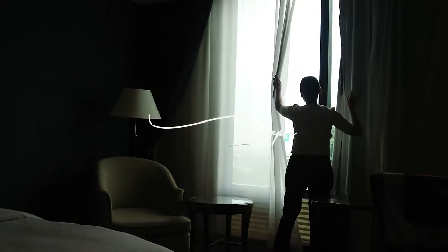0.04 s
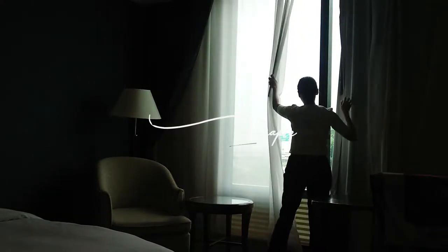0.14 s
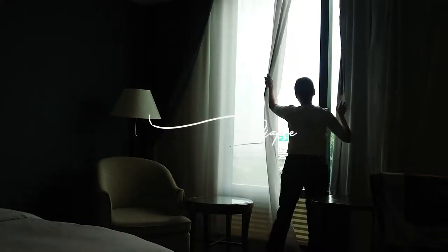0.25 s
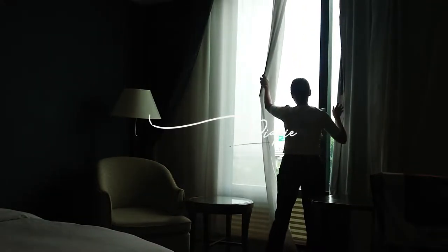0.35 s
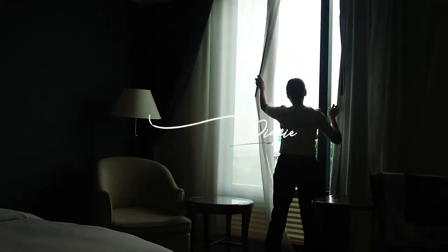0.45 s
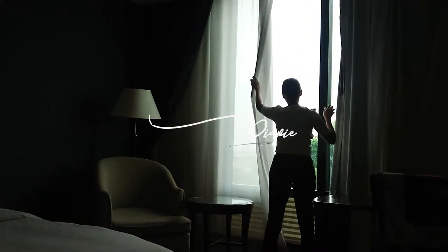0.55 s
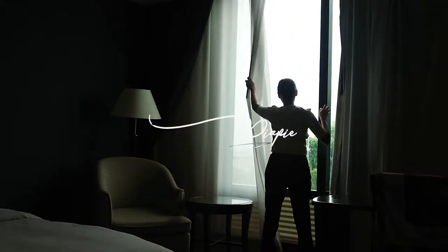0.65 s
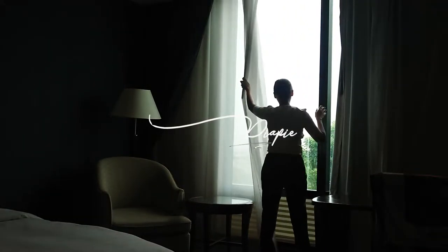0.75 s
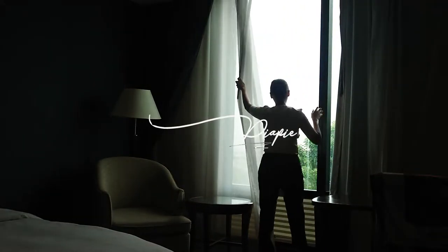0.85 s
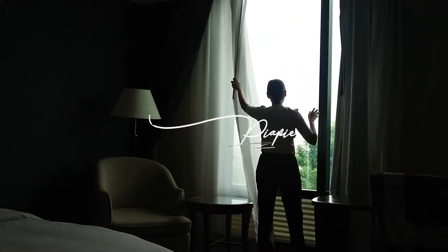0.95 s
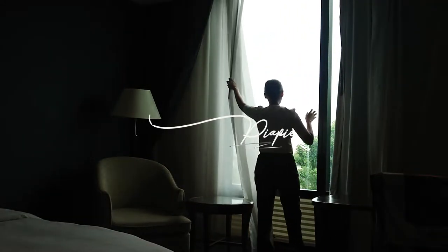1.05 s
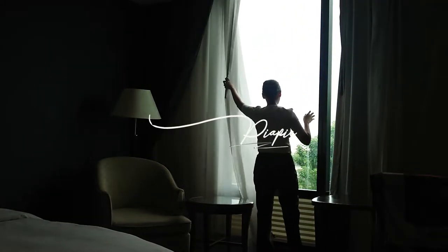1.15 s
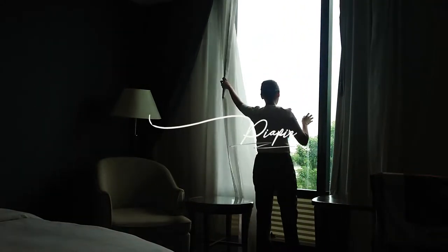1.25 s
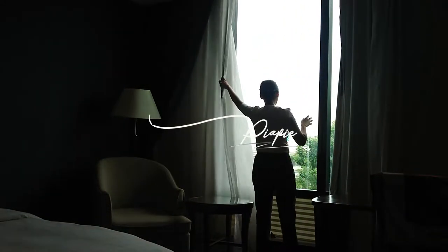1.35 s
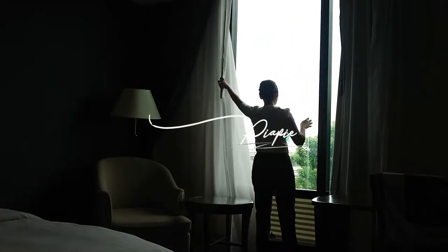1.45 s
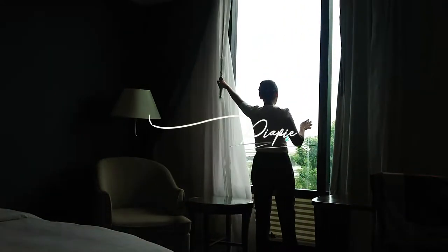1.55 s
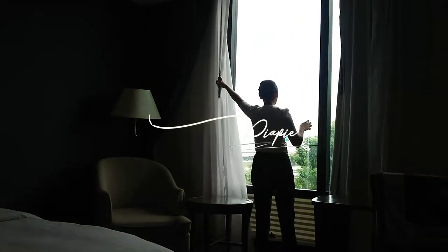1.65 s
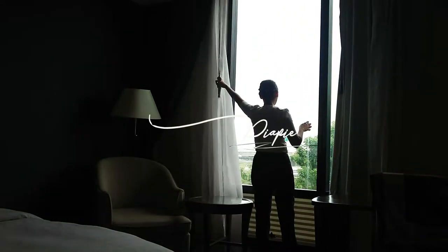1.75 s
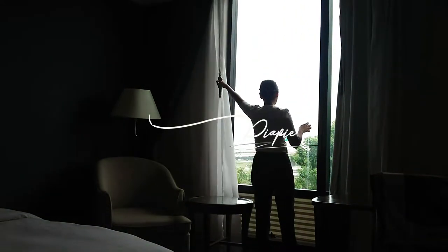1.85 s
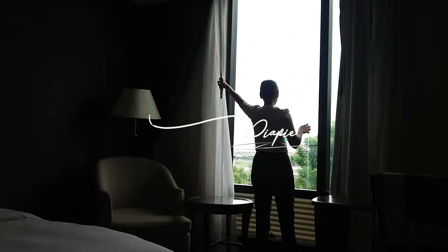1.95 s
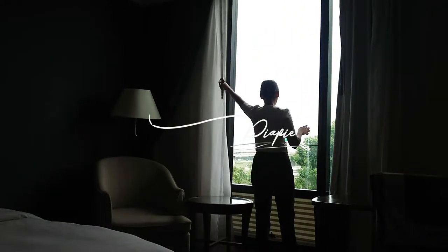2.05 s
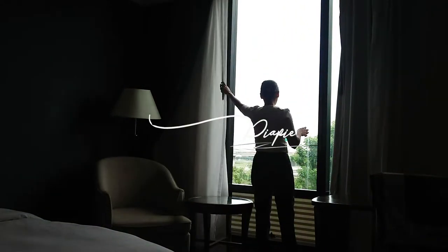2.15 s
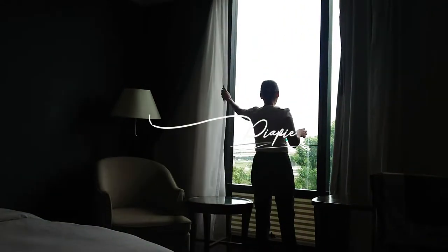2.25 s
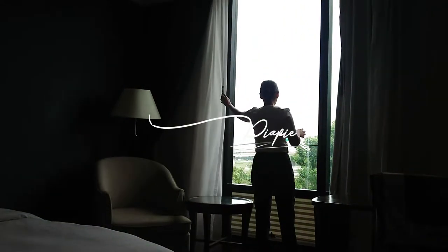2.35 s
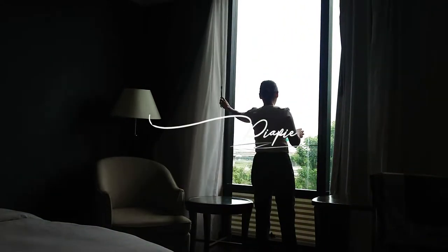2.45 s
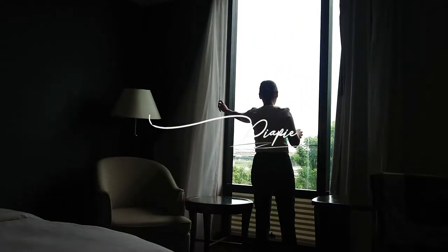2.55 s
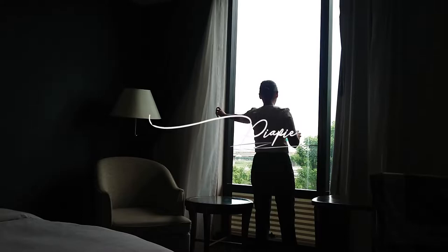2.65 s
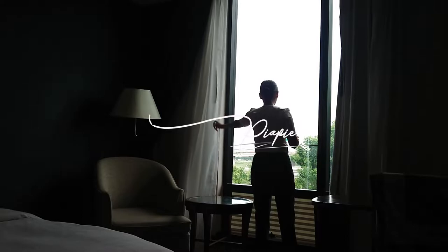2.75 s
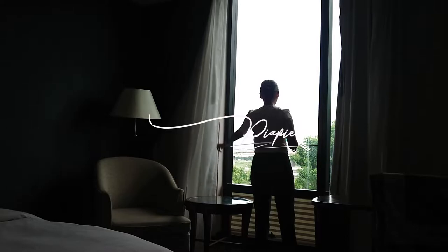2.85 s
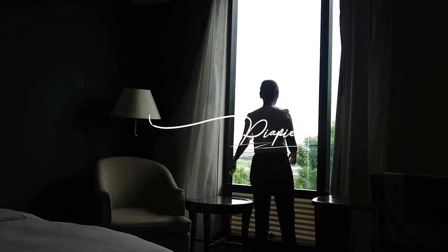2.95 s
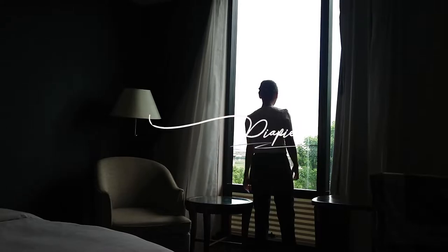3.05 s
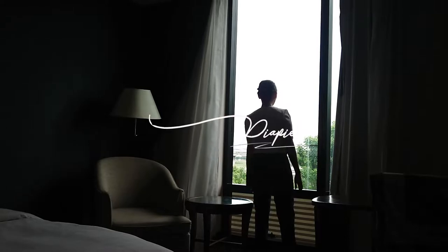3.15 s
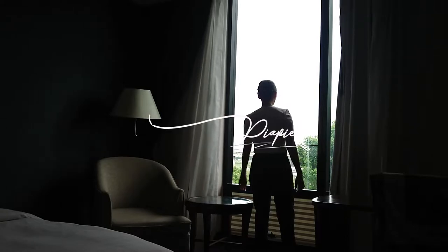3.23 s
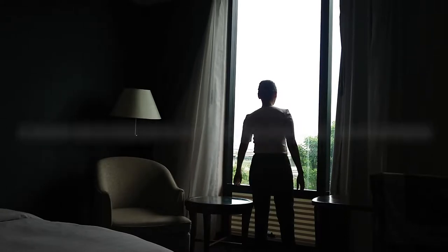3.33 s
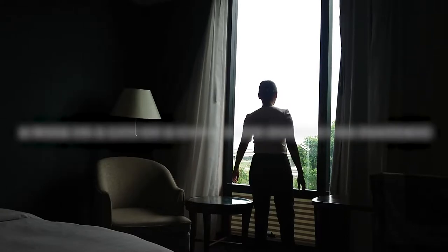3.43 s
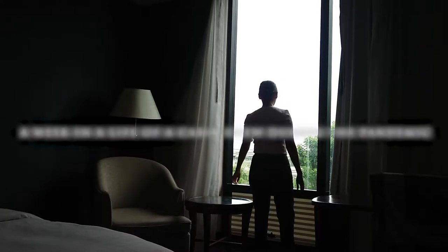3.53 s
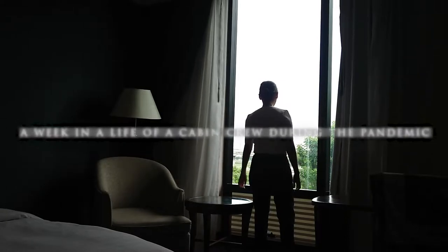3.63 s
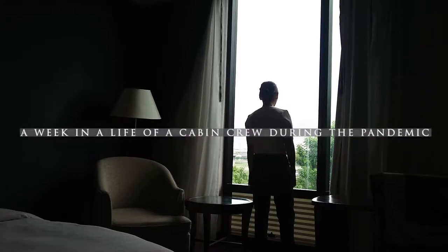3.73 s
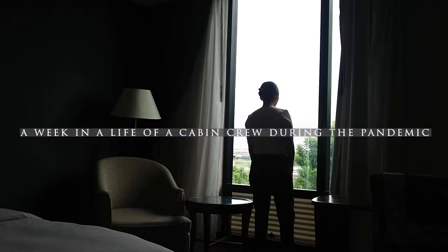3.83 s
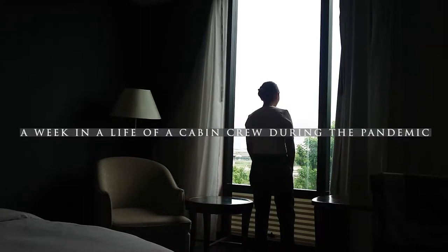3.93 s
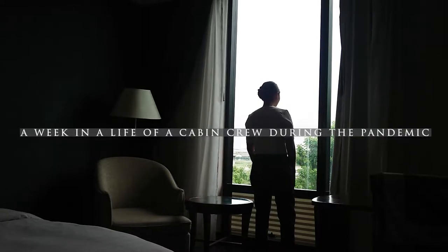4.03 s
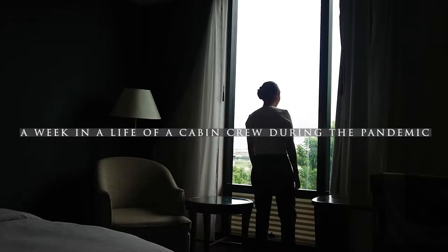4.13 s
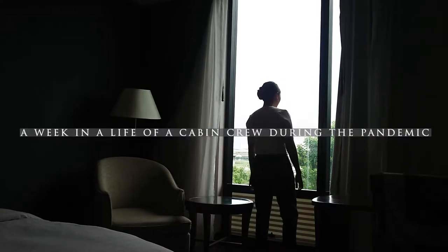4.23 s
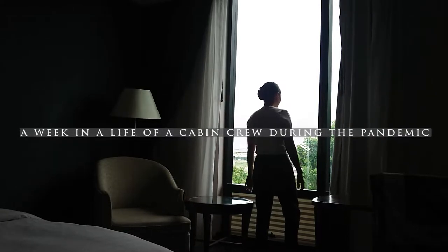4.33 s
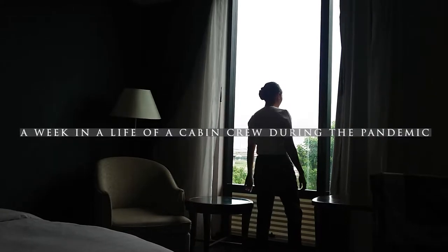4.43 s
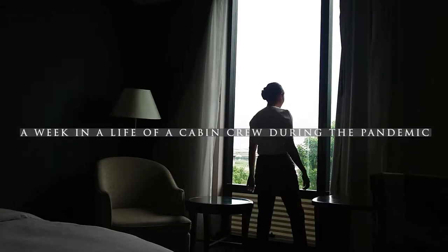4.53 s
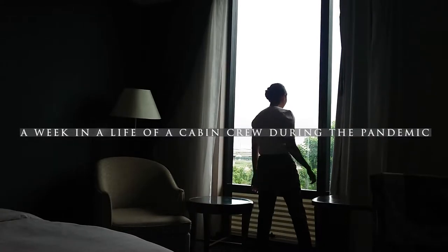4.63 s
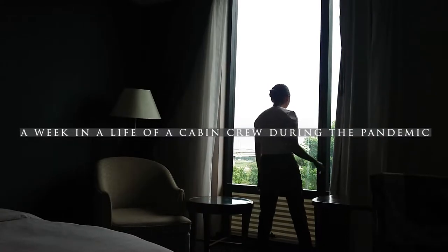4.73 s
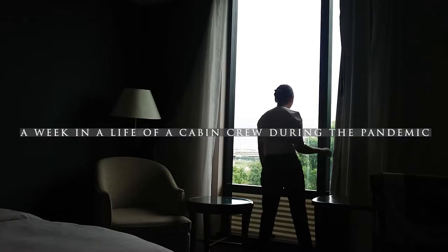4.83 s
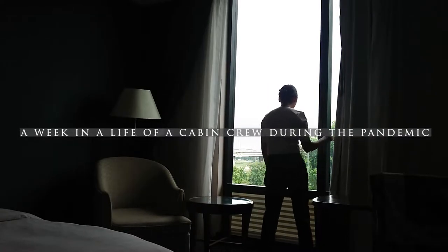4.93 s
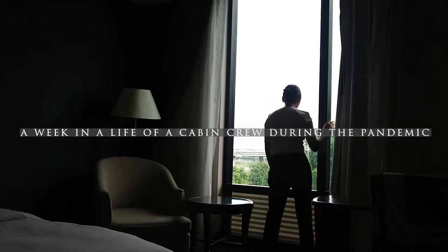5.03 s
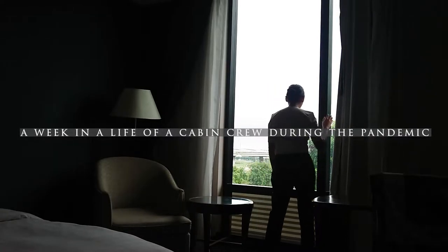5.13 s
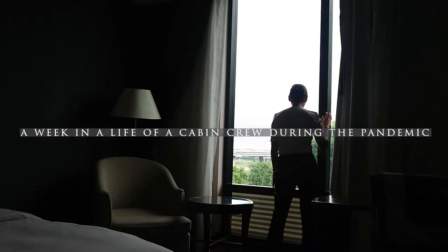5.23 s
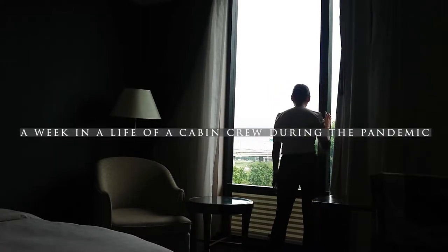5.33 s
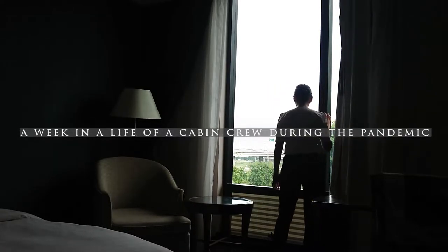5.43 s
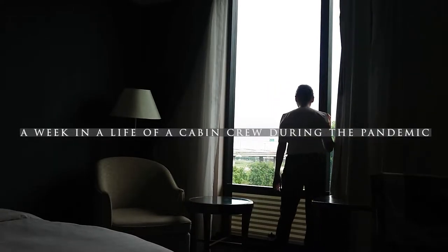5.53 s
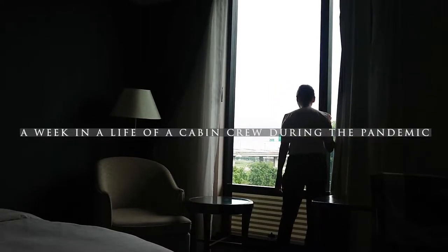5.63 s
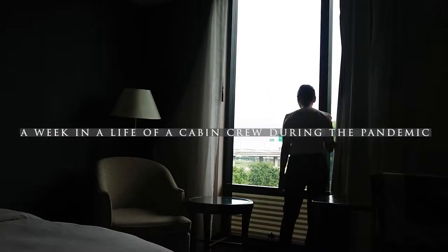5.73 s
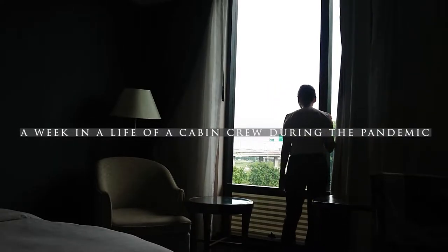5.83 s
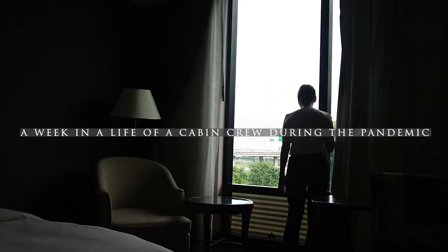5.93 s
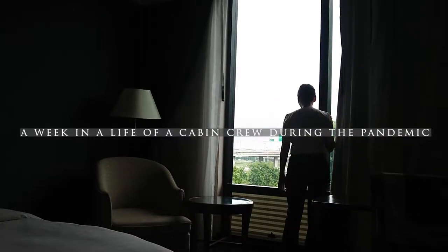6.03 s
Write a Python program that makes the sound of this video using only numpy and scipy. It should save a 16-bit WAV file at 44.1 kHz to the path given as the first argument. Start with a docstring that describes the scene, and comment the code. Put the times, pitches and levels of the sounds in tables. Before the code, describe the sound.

A curtain scrapes and rattles along its rail with sharp glider knocks, fades to a brief silence, then a clock ticks slowly over faint low room hum.

```python
"""A curtain is swept along its rail: gliders scrape, rattle and knock, cloth swishes, and then the whole sound
fades out to silence. All of these are gritty noise shaped by envelopes and sent through resonances and drawn
spectra. After a short gap the quiet room comes in: noise for rumble and hiss, a wavering low hum, narrow noise
bands that waver like tones, and a few soft decaying thumps. A quartz clock then steps once a second, each step
a cluster of gear taps that ring its plastic case."""
import sys
import numpy as np
from scipy import signal
from scipy.fft import rfft, irfft, next_fast_len
from scipy.io import wavfile
from scipy.ndimage import uniform_filter1d

SR = 44100
rng = np.random.default_rng(int(sys.argv[2]) if len(sys.argv) > 2 else 0)


def materialize(psi):
    """Save the field psi as 16-bit PCM at rate SR to the path in sys.argv[1].

    A 1-D psi becomes a single channel; in a 2-D psi each row is a channel.
    """
    bounded = np.clip(np.atleast_2d(psi).T, -1, 1)
    quanta = np.round(bounded * 32767).astype(np.int16)
    wavfile.write(sys.argv[1], SR, quanta)


N = 268128

CURTAIN_IN_S, CURTAIN_OUT_S, ROOM_IN_S = .1935, 1.818, 1.9595
SETTLE_S = 1.3  # the random touches and small knocks of the gliders end here
MIDDLING_DB, SLACK_DB = -45, -65  # scrape levels of a middling and a slack pull

# pull on the curtain, heard as the level of the scrape: time_s, level_db
PULL = [(.194, -56), (.225, -65.5), (.28, -54.5), (.45, -51.5), (.53, -45.5), (.62, -47.5), (.79, -39),
        (.84, -35.5), (.95, -35.5), (1.03, -42), (1.15, -45.5), (1.29, -53), (1.35, -69), (1.45, -63),
        (1.57, -65), (1.64, -70), (1.815, -79.5)]


def curtain():
    """Sliding contact makes scrape, rattle and swish follow the pull; bunching gliders add knocks."""
    pull_db = curve(PULL)
    buzz_db, buzz_hz = -81, 120
    buzz = undb(buzz_db) * np.sqrt(2) * np.sin(2 * np.pi * buzz_hz * seconds())
    sliding = scrape(pull_db) + cloth(pull_db) + rattle(pull_db)
    return sliding + rubs() + buzz + room(knocks(pull_db), t60=0.11, db=-14.5)


def scrape(pull_db):
    """Gritty friction drives the rail; its level shivers around the pull."""
    shiver_db = 1.2 * walk(45)
    steady = played(undb(pull_db + shiver_db), rail, scatter_db=2)
    return patchy(steady, depth_db=4, rate=40)


# rail resonances: pitch_hz, width_hz, level_db
RAIL_MODES = [(960, 200, -1.5), (2040, 160, 0.5), (2810, 263, -7.5), (3576, 130, -1), (4200, 450, -13.5),
              (4770, 180, 3)]
# overall spectrum of the scrape: pitch_hz, relative_level_db
SCRAPE_SPECTRUM = [(290, -39), (500, -6.5), (750, -6), (1130, 0.5), (1600, -1.5), (2040, 5), (3060, -6.5),
                   (3390, 0), (6230, -11.5), (12500, -26), (16000, -37)]


def rail(x):
    """Rail modes ring on top of the direct contact noise."""
    return colour(x + undb(4.0) * ring(x, RAIL_MODES), SCRAPE_SPECTRUM)


# edges between the bands that swell separately: pitch_hz
PATCH_EDGES = [1200, 2200, 3400, 4800]


def patchy(x, depth_db, rate):
    """Neighbouring bands swell and sink on their own as different gliders bear on the rail."""
    lowpassed = [signal.filtfilt(*signal.butter(2, hz, fs=SR), x) for hz in PATCH_EDGES]
    edges = [0] + lowpassed + [x]
    # the difference of two lowpassed copies is one band
    return sum(undb(depth_db * walk(rate)) * (upper - lower) for lower, upper in zip(edges, edges[1:]))


# spectrum of the swish: pitch_hz, relative_level_db
CLOTH_SPECTRUM = [(18, -71.5), (30, -40.5), (81, -27.5), (146, -5.5), (310, -6.5), (347, 1.5), (488, -8.5),
                  (532, -3), (579, -9), (900, -10), (1170, -38.5), (1980, -120)]
# pelmet board resonances, also rung by the thuds: pitch_hz, width_hz, level_db
BOARD_MODES = [(155, 42, -11.5), (199, 30, -7.5), (244, 78, -1), (339, 52, -0.5), (452, 22, 1.5),
               (498, 30, 0.5), (703.5, 32, 0)]


def cloth(pull_db):
    """Swish of fabric with the board's modes; it gains on the scrape as the pull slackens."""
    middling_pull_db, per_db = -2, -0.2154  # relative to the scrape
    swish_db = middling_pull_db + per_db * (np.maximum(pull_db, SLACK_DB) - MIDDLING_DB)
    flutter_db = 1.5 * walk(25)

    def fabric(x):
        """Board modes within the spectrum of the swish."""
        return colour(x + undb(2) * ring(x, BOARD_MODES), CLOTH_SPECTRUM)

    return played(undb(pull_db + swish_db + flutter_db), fabric, scatter_db=1.5)


def rattle(pull_db):
    """Treble noise of gliders touching at random, over a steady bed that outlasts the touches."""
    start_db, moving_db, settled_db = -42, -16.5, -6.5  # relative to the scrape
    # the gliders take up the slack one by one
    times_s = [CURTAIN_IN_S + 0.026, CURTAIN_IN_S + .11, SETTLE_S, SETTLE_S + 0.042]
    rattle_db = np.interp(seconds(), times_s, [start_db, moving_db, moving_db, settled_db])
    # the rattle lags behind a hard pull
    rattle_db = rattle_db - 0.04 * np.maximum(pull_db - MIDDLING_DB, 0)
    touches_per_s, touch_decay_s = 150, .002
    touches = (rng.random(N) < touches_per_s / SR) * undb(-7 + 2.5 * rng.exponential(size=N))
    touches[int(SETTLE_S * SR):] = 0
    flurry = signal.lfilter([1], [1, -np.exp(-1 / (touch_decay_s * SR))], touches)
    return played(undb(pull_db + rattle_db) * (0.35 + flurry), tick, scatter_db=1.5)


# spectrum of bright contacts: pitch_hz, relative_level_db
TICK_SPECTRUM = [(4000, -29.5), (7000, -2), (9600, 0), (12500, -1), (15000, -8.5), (16500, -31.5),
                 (20000, -60)]


def tick(x):
    """Bright colour of hard little contacts."""
    return colour(x, TICK_SPECTRUM)


# gliders knocking: start_s, level_db, then relative to it thud_db, hollow_db, tick_db
KNOCKS = [(.1945, -32, -1, 12.5, -26), (.25, -48.5, -4, 6, -18), (0.34, -40, -17, -11, -6.5),
          (.379, -48, -12, -7, -0.5), (.406, -40, -22, 2, -17), (.444, -37, -28, -11, -13.5),
          (0.448, -24, -47, -15, -14), (.4826, -29, -12.5, -3.5, -9.5), (.534, -39.5, -6, -5, -8),
          (0.56, -37, -23, -9, -8.5), (.615, -36, -4, -20, -16.5), (.665, -21, -25, -13, -4.5),
          (0.764, -23.5, -18, -10.5, -25), (0.8404, -12.5, -3.5, -8.5, -1),
          (0.898, -25.5, -26.5, -16.5, -14.5), (0.948, -28, -16.5, 4.5, -25), (1.031, -27.5, -19, -24, -22),
          (1.246, -51, -13, -21, -3), (1.261, -31.5, -7, -14, -15.5), (1.317, -52.5, 5, 4, -15),
          (1.4595, -55, 13.5, 4, -11), (1.47, -41, -17, -3, -20), (1.5828, -51.5, -13, 8.5, -27),
          (1.61, -55, -1, 0, -24)]
# rail bracket resonances: pitch_hz, width_hz, level_db
BRACKET_MODES = [(850, 140, -0.5), (1150, 240, 1), (1340, 150, 0), (1680, 100, -7), (2050, 300, -8),
                 (2840, 400, -10.5)]


def knocks(pull_db):
    """Each collision rings rail and bracket, ticks brightly and pushes the board."""
    events = KNOCKS + small_knocks(pull_db)
    start_s, db, thud_db, hollow_db, tick_db = np.transpose(events)
    length_s = np.where(np.arange(len(start_s)) < len(KNOCKS), .0048, .0025)  # large, small

    def struck_rail(x):
        """Rail through one very broad resonance."""
        return ring(rail(x), [(4600, 4500, 0)])

    def bracket(x):
        """Hollow answer of the rail bracket."""
        return ring(x, BRACKET_MODES)

    out = played(bursts(start_s, db, length_s), struck_rail, scatter_db=2.8)
    out += played(bursts(start_s, db + tick_db, length_s), tick, scatter_db=0.69)
    out += played(bursts(start_s, db + hollow_db, 1.1 * length_s), bracket, scatter_db=0.92)
    # the board behind the rail answers a little later and lower
    return out + thuds(start_s + 0.0062, db + thud_db)


# make-up of a small knock: level_over_scrape_db, then relative to it thud_db, hollow_db, tick_db
LIGHT_KNOCK = (8, -14, -6, -9)


def small_knocks(pull_db):
    """Lighter knocks at random moments while the gliders move, growing with the pull up to a middling one."""
    per_s, moving_s = 18, SETTLE_S - CURTAIN_IN_S
    when, size = rng.random((int(per_s * moving_s), 2)).T
    start_s = CURTAIN_IN_S + when * moving_s
    over_db, *colours_db = LIGHT_KNOCK
    scrape_db = np.minimum(pull_db[(start_s * SR).astype(int)], MIDDLING_DB)
    level_db = scrape_db + over_db + 6 * (size - .5)
    return [(s, db, *colours_db) for s, db in zip(start_s, level_db)]


def thuds(start_s, peak_db):
    """One soft push a knock sets the board ringing; peak level as given."""
    blows = np.zeros(N)
    blows[(start_s * SR).astype(int)] = undb(peak_db)
    push = np.zeros(SR // 10)
    push[:50] = np.hanning(50)
    # modes broader than in the swish, so they die sooner
    answer = ring(push, [(hz, 1.7 * width, db) for hz, width, db in BOARD_MODES])
    # a narrow board radiates little deep bass
    answer = signal.lfilter(*signal.butter(3, 130, "high", fs=SR), answer)
    return signal.fftconvolve(blows, answer / np.abs(answer).max())[:N]


# gliders rubbing with a narrow squeaky colour: start_s, end_s, pitch_hz, level_db
RUBS = [(.26, 0.312, 2850, -65), (0.307, 0.339, 2720, -44), (0.312, .328, 3540, -50),
        (1.432, 1.51, 4530, -70), (1.466, 1.503, 1870, -54.5), (1.542, 1.582, 1950, -59),
        (1.53, 1.589, 4440, -66), (1.58, 1.802, 4360, -75.5)]


def rubs():
    """Noise through a doubled narrow resonance, swelling and fading."""
    out = np.zeros(N)
    for start_s, end_s, hz, db in RUBS:
        mode = [(hz, 0.14 * hz, 0)]
        i, size = int(start_s * SR), int((end_s - start_s) * SR)
        band = ring(ring(rng.standard_normal(SR // 4), mode), mode)
        out[i:i + size] += undb(db) * unit(band)[-size:] * np.sqrt(np.hanning(size))
    return out


# steps of the clock: start_s, level_db, then relative to it first_tap_db, rebounds_db
STEPS = [(2.7407, -47, 0, -1), (3.74, -49, 3.5, 3), (4.7371, -45, -7, -1), (5.738, -48, 2.5, 10.5)]
# gear train taps in a step, before scatter: delay_s, relative_level_db, relative_low_mode_db
GEAR_TAPS = [(.011, -2.5, -2), (.021, 1.5, 3.5), (.033, -0.5, -0.5), (.051, -4, 2.5)]
# the hand settling, before scatter: delay_s, relative_level_db, relative_low_mode_db
REBOUNDS = [(0.071, -23, -11), (0.093, -22.5, 2)]
# upper modes of the case: pitch_hz, width_hz, level_db
CASE_MODES = [(1550, 68, 8), (1857, 60, 6), (2133, 69, 10.5), (2950, 92, 3.5), (3050, 820, -8),
              (3850, 140, 9.5), (4470, 33, 0), (4860, 170, 2), (4900, 28, 3), (7300, 840, 16.5)]
# spectrum of the gear chatter: pitch_hz, relative_level_db
GEAR_SPECTRUM = [(500, -23), (900, -6.5), (2500, -2.5), (5000, -5), (6500, -26), (11500, -30.5),
                 (12500, -58)]


def clock():
    """Gear taps ring the plastic case: one strong low mode and many weaker ones."""
    firsts, later = [], []
    for step_s, db, first_db, rebound_db in STEPS:
        firsts.append((step_s, db + first_db, -7.5))
        later += [(step_s + delay, db + tap_db, low_db) for delay, tap_db, low_db in GEAR_TAPS]
        later += [(step_s + delay, db + tap_db + rebound_db, low_db) for delay, tap_db, low_db in REBOUNDS]
    later = np.array(later)
    later += rng.standard_normal(later.shape) * [.0025, 1.5, 1.5]  # scatter: s, dB, dB
    start_s, level_db, low_db = np.vstack([firsts, later]).T
    length_s = np.full(len(start_s), .011)

    def low_mode(x):
        """Strong low mode of the case, its skirts trimmed by a broader one."""
        return ring(ring(x, [(1010, 126, 0)]), [(1010, 500, 0)])

    def upper_case(x):
        """Direct gear noise and the upper modes of the case."""
        return colour(x + undb(-5.5) * ring(x, CASE_MODES), GEAR_SPECTRUM)

    boom = played(bursts(start_s, level_db + low_db, length_s), low_mode, scatter_db=0.58)
    chatter = played(bursts(start_s, level_db, length_s), upper_case, scatter_db=3.16)
    return room(boom + chatter, t60=0.083, db=-15)


def air():
    """The quiet room: broad noise, mains hum, wavering bands and thumps summed."""
    return rumble_and_hiss() + mains_hum() + wavering_tones() + thumps()


# spectrum of the room's rumble and hiss: pitch_hz, relative_level_db
AIR_SPECTRUM = [(6, -13), (13, 3), (20, -4), (45, -25), (62, -21.5), (150, -26), (260, -30), (400, -34),
                (1340, -41.5), (5600, -47), (6300, -50), (11800, -55), (12100, -66), (16000, -75)]


def rumble_and_hiss():
    """Steady noise, heaviest in the deep bass."""
    return undb(-61.5) * unit(colour(rng.standard_normal(N), AIR_SPECTRUM))


# rms level of the mains hum: time_s, level_db
MAINS_LEVEL = [(1.96, -64.5), (2.9, -69.5), (3.3, -72.5), (3.45, -65.5), (6.08, -68)]


def mains_hum():
    """One low sine whose pitch wanders slightly."""
    hz = 48 * (1 + .004 * walk(2))
    return undb(curve(MAINS_LEVEL)) * np.sqrt(2) * np.sin(2 * np.pi * np.cumsum(hz) / SR)


# wavering tones: pitch_hz, width_hz, rms_level_db
TONES = [(226, 12, -83), (5880, 50, -97), (8700, 300, -98)]


def wavering_tones():
    """Noise through a doubled narrow resonance wavers like an unsteady tone."""
    out = np.zeros(N)
    for hz, width, db in TONES:
        mode = [(hz, width, 0)]
        out += undb(db) * unit(ring(ring(rng.standard_normal(N), mode), mode))
    return out


# soft low thumps through the floor: start_s, starting_level_db, pitch_hz, decay_t60_s
THUMPS = [(1.967, -45, 39.2, 0.19), (2.439, -51, 79, .1), (4.774, -56.5, 106.5, 0.083),
          (5.029, -43.5, 45, 0.087), (5.837, -45.5, 43.6, 0.084)]


def thumps():
    """Low sines that start at once and die exponentially."""
    out = np.zeros(N)
    for start_s, db, hz, t60 in THUMPS:
        since = np.maximum(seconds() - start_s, 0)
        out += undb(db - 60 * since / t60) * np.sin(2 * np.pi * hz * since)
    return out


def room(x, t60, db):
    """A short diffuse tail, duller than the direct sound."""
    t = np.arange(int(.4 * SR)) / SR
    tail = rng.standard_normal(len(t)) * undb(-60 * t / t60) * (t > .004)
    tail = signal.lfilter([1], [1, -.65], tail)
    return x + undb(db) * signal.fftconvolve(x, tail / np.sqrt(np.sum(tail ** 2)))[:N]


def played(env, body, scatter_db):
    """Grit shaped by an envelope excites a body whose gain for steady noise is 1."""
    noise = grit(scatter_db)
    return body(env * noise) / np.std(body(noise))


def grit(scatter_db):
    """Noise whose samples differ widely in size: tiny contacts."""
    return unit(rng.standard_normal(N) * undb(scatter_db * rng.exponential(size=N)))


def bursts(start_s, level_db, length_s):
    """Envelope of short flurries of contacts: quick rise, decay set by the length."""
    env = np.zeros(N)
    crest_db = 5  # noise peaks stand this far above the envelope
    for s, gain, length in zip(start_s, undb(level_db - crest_db), length_s):
        i = int(s * SR)
        u = np.arange(min(int(.08 * SR), N - i)) / SR / length
        env[i:i + len(u)] += gain * (1 - np.exp(-9 * u)) * np.exp(-u ** 1.4)
    return env


def ring(x, modes):
    """Sum of resonances with alternating sign."""
    out = np.zeros(len(x))
    for k, (hz, width, db) in enumerate(modes):
        out += (-1) ** k * undb(db) * signal.lfilter(*signal.iirpeak(hz, hz / width, SR), x)
    return out


def colour(x, points):
    """Shape by a spectrum drawn on a log-frequency axis."""
    size = next_fast_len(N)
    hz, db = np.transpose(points)
    f = np.maximum(np.arange(size // 2 + 1) * SR / size, 1)
    gain = undb(np.interp(np.log(f), np.log(hz), db, left=-80, right=-80))
    return irfft(rfft(x, size) * gain, size)[:N]


def walk(rate):
    """Random levels, rate of them a second, joined by slews; spread near 1."""
    k = int(SR / rate)
    return uniform_filter1d(np.repeat(rng.standard_normal(N // k + 1), k), k)[:N]


def curve(table):
    """Levels of a table, joined by straight lines in time."""
    return np.interp(seconds(), *np.transpose(table))


def seconds():
    """Time of every sample."""
    return np.arange(N) / SR


def undb(db):
    """Decibels to gain."""
    return 10 ** (np.asarray(db) / 20)


def unit(x):
    """Scale to rms 1."""
    return x / np.sqrt(np.mean(x ** 2))


def scene():
    """The sweep, a silent gap, then the room."""
    t = seconds()
    fade_from_s, fade_db_per_s = 1.593, 114.5
    fade = undb(-fade_db_per_s * np.maximum(t - fade_from_s, 0))
    sweep = curtain() * (t > CURTAIN_IN_S) * (t < CURTAIN_OUT_S) * fade
    quiet = (air() + clock()) * np.clip((t - ROOM_IN_S) / .002, 0, 1)
    return (sweep + quiet)[None]


def record(dry):
    """Steep cut of the treble above 15.9 kHz."""
    return signal.sosfilt(signal.ellip(8, .2, 70, 15900, fs=SR, output="sos"), dry)


dry = scene()
out = record(dry)
materialize(out)
```